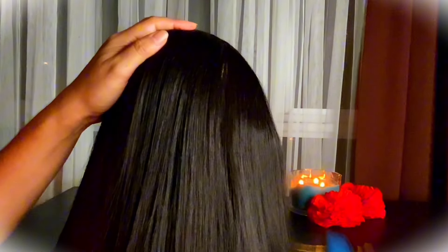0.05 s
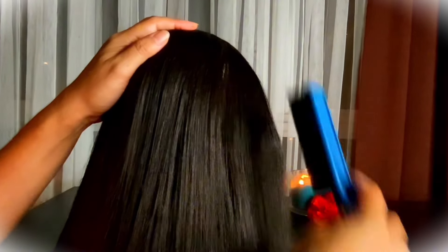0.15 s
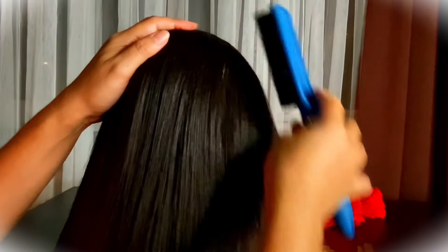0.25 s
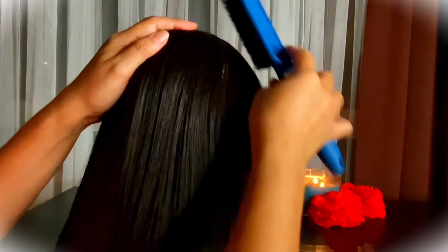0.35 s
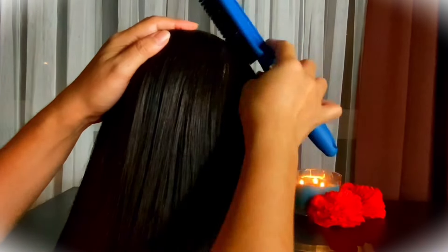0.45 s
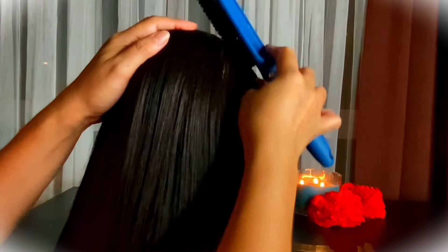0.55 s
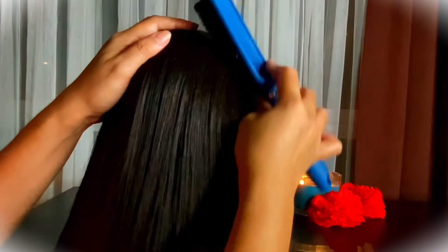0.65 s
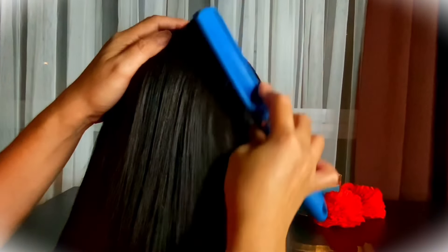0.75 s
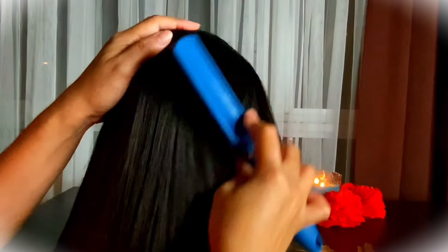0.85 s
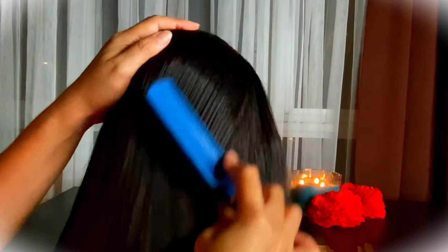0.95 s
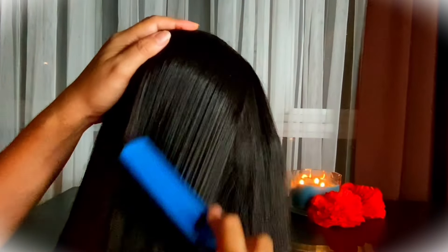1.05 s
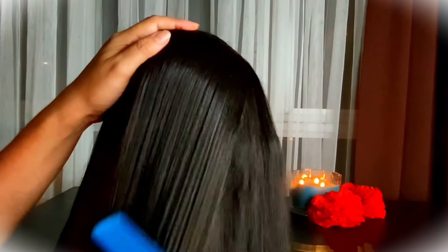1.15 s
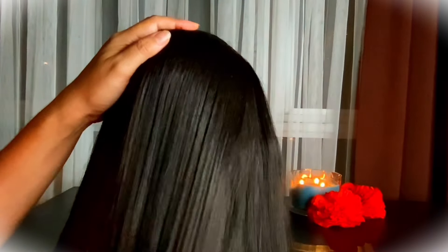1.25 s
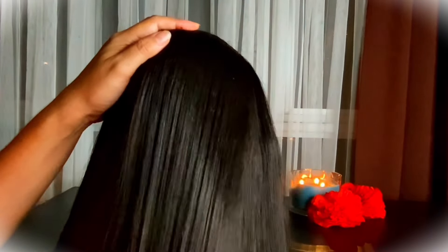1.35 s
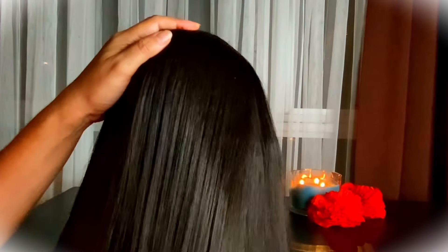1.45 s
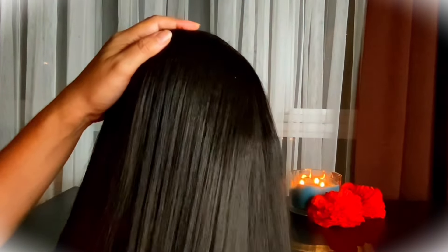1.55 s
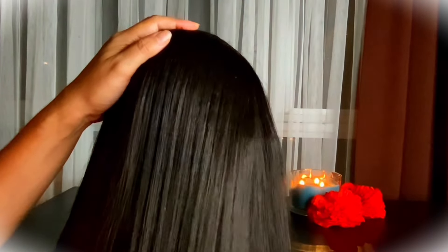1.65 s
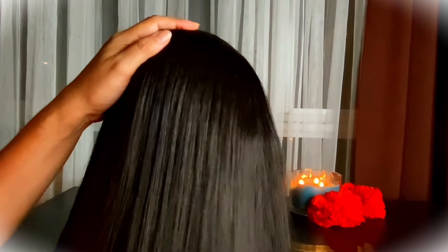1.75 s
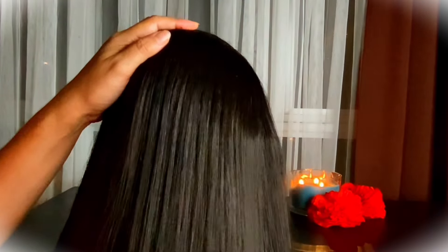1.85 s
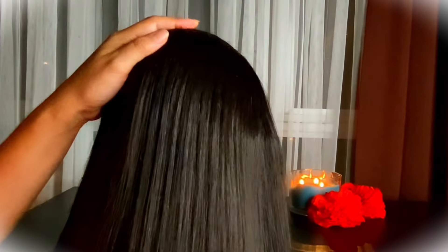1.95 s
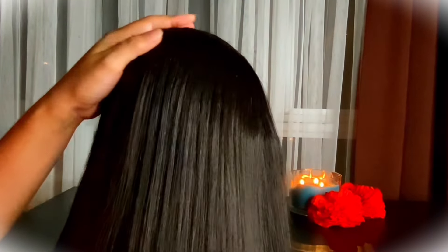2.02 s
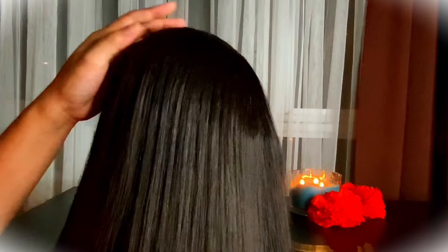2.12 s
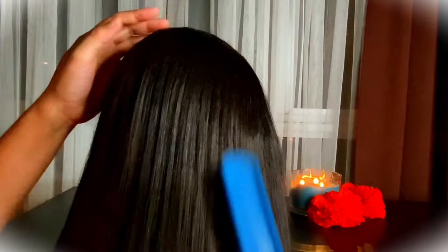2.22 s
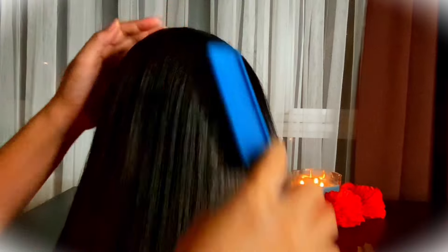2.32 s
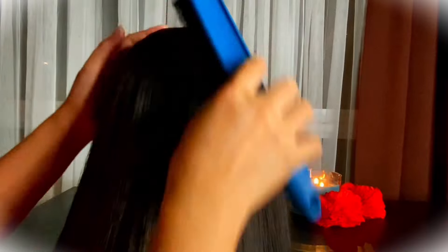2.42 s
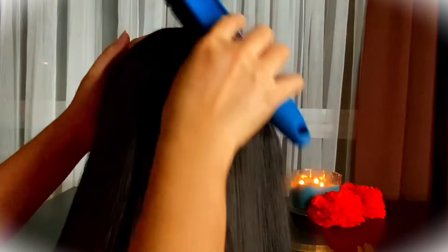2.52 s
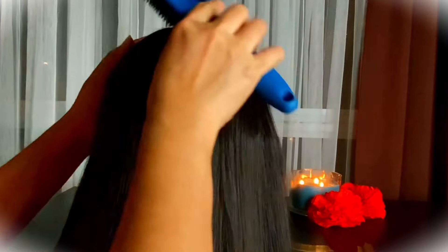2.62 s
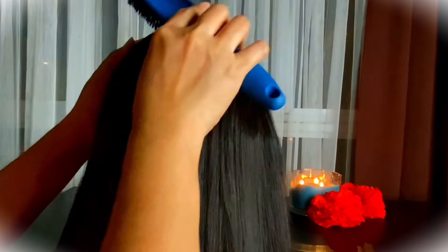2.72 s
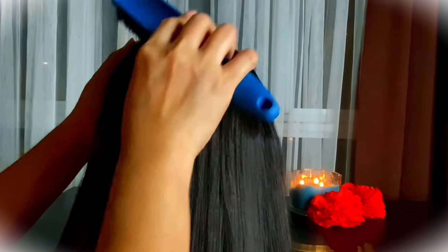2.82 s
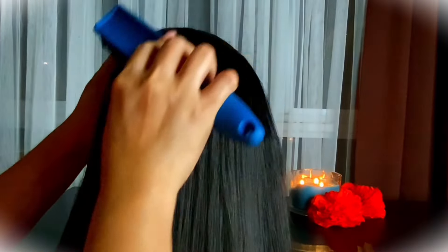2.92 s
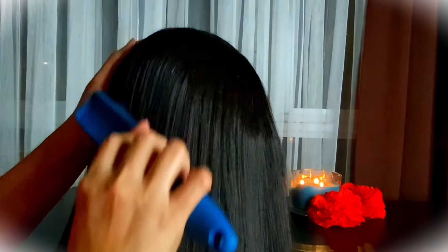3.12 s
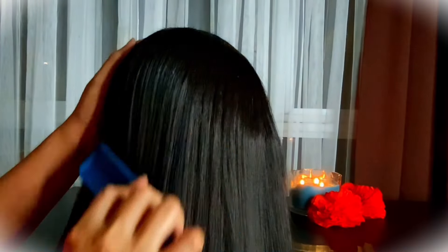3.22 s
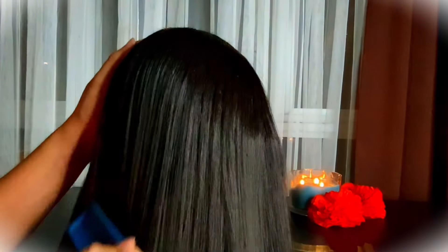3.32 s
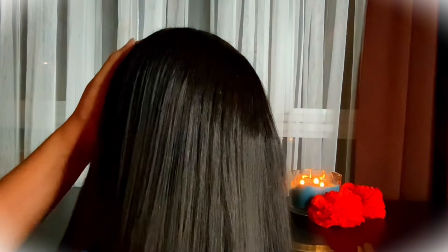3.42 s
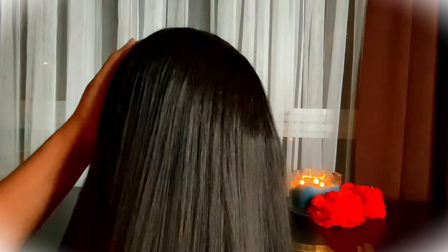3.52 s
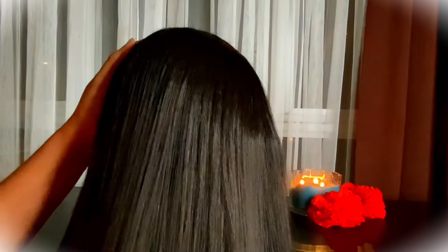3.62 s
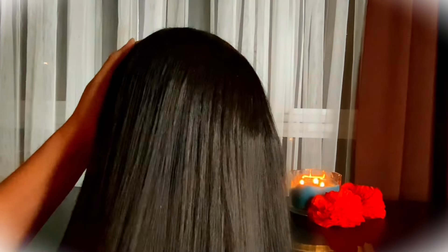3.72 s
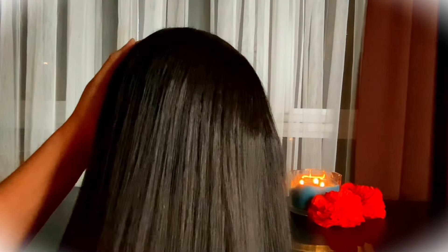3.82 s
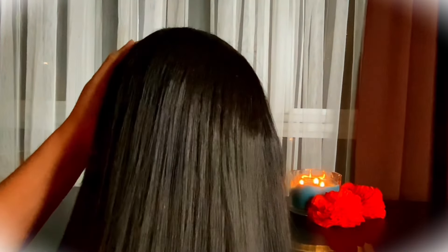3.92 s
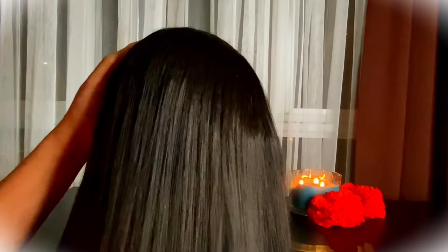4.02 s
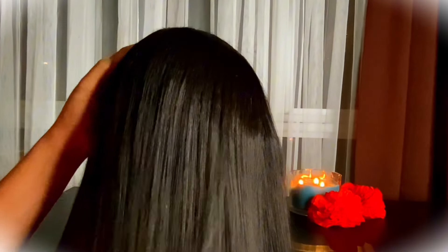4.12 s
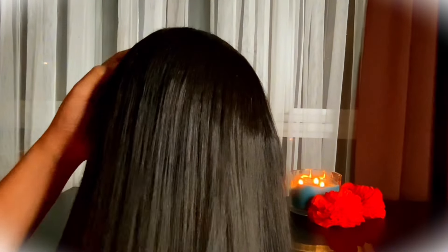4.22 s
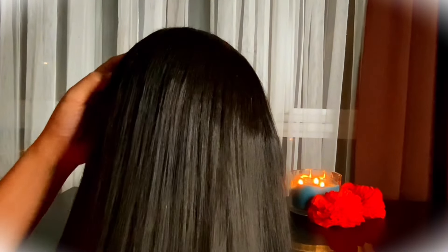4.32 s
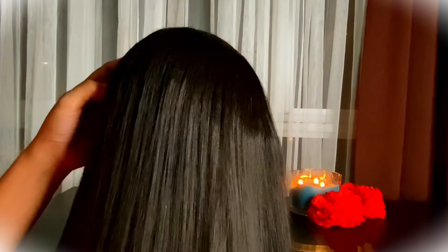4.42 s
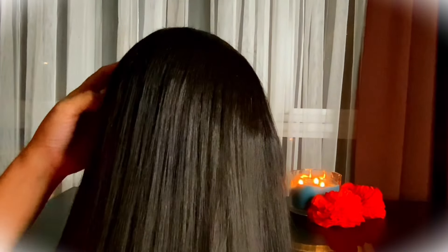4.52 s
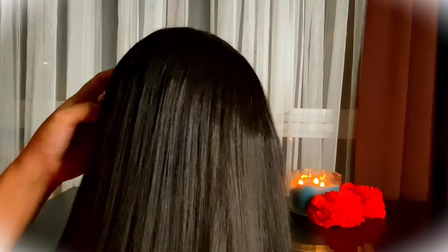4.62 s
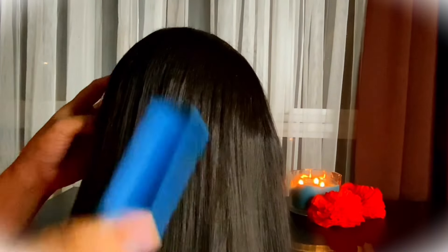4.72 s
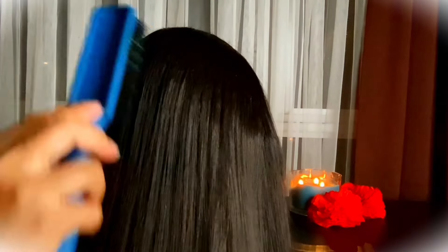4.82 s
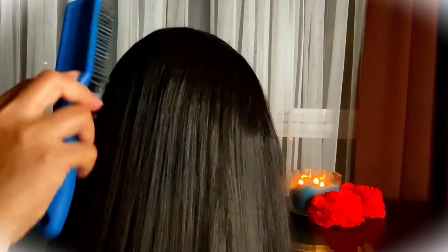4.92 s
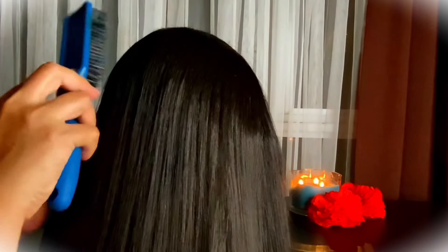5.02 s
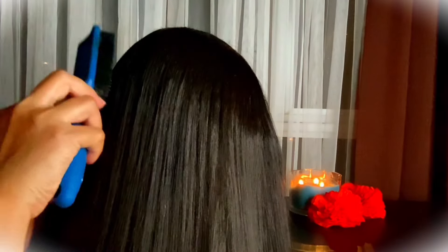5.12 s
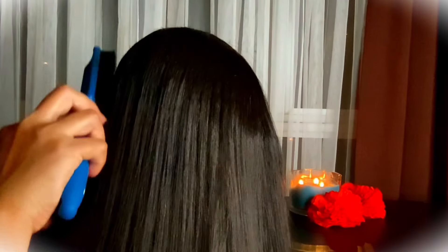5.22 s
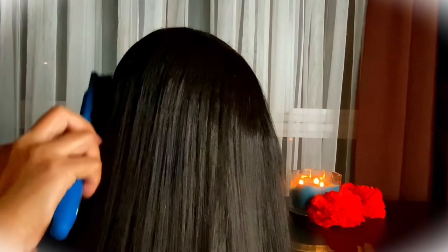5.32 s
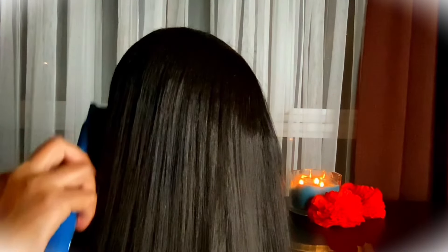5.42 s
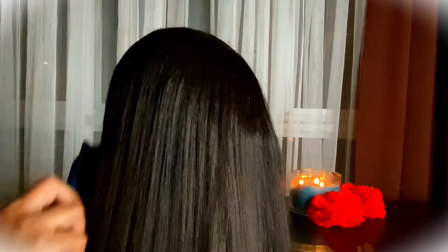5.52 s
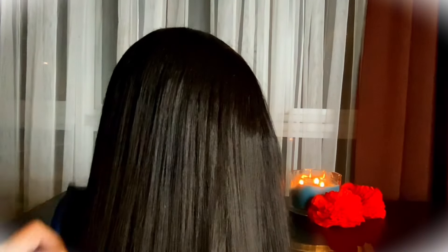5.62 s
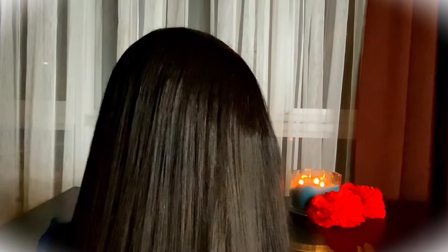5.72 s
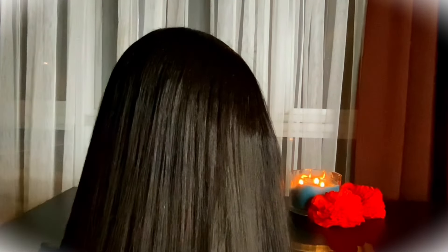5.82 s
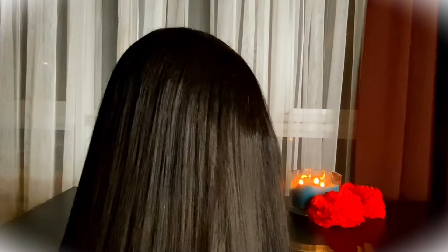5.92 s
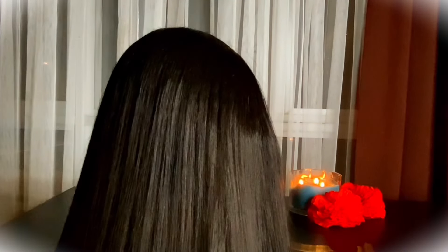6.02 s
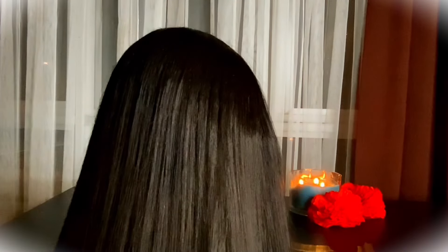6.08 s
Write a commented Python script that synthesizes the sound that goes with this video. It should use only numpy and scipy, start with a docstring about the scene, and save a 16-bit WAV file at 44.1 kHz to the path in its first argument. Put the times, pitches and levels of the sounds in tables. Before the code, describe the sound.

Close stereo hair brushing: one strong crackling stroke with low bumps, then two softer swishes with tiny strand snaps over faint hiss.

```python
"""Brush bristles swish down long hair in a quiet room, heard close, by a microphone at each ear of the head.
Strokes and crown scrapes are streams of tiny slips on noise, coloured apart for each kind of contact.
Strands snap free as short noise bursts; two short thin hisses, mostly treble, are played centred.
The head's drag is noise rumble and rub; thuds, pops, knocks and a few pitched ticks are quickly ringing sines.
Hiss and a low murmur from each microphone lie under it all."""
import sys
import numpy as np
from scipy import signal
from scipy.fft import rfft, irfft, next_fast_len
from scipy.io import wavfile
from scipy.ndimage import uniform_filter1d, map_coordinates

SR = 44100
rng = np.random.default_rng(int(sys.argv[2]) if len(sys.argv) > 2 else 0)


def digitize_waveform(pressure):
    """Quantize a signal to 16-bit integers and store it at the path in sys.argv[1].

    Rows of a 2-D input are taken as channels; values are limited to [-1, 1].
    """
    field = np.atleast_2d(pressure).T
    bounded = np.clip(field, -1, 1)
    quanta = np.round(bounded * 32767).astype(np.int16)
    wavfile.write(sys.argv[1], SR, quanta)


N = 271215  # samples


def amp(db):
    """Decibels to gain."""
    return 10 ** (np.asarray(db) / 20)


def unit(x):
    """Scaled to rms 1."""
    return x / np.sqrt(np.mean(x ** 2) + 1e-20)


def curves(rows):
    """One value per sample for each column after the time."""
    times_s, *columns = np.transpose(rows)
    return [np.interp(np.arange(N) / SR, times_s, column) for column in columns]


def strokes(tables, fade_s=0.25):
    """Tables joined into curves; the level sinks away just outside each table."""
    rows = []
    for table in tables:
        first, last = table[0], table[-1]
        before = (first[0] - fade_s, -100, *first[2:])
        after = (last[0] + fade_s, -100, *last[2:])
        rows += [before, *table, after]
    return curves(rows)


def ears(pan_db):
    """Left and right gains; a positive pan leans left."""
    return amp(np.array([pan_db / 2, -pan_db / 2]))


def spread(pair, alike):
    """Two unrelated streams mixed to a given likeness of the ears."""
    turn = np.arccos(np.clip(alike, -1, 1)) / 2
    mid, side = np.cos(turn) * pair[0], np.sin(turn) * pair[1]
    return np.array([mid + side, mid - side])


def wobble(rate, channels=1):
    """Smooth random curves, rate knots a second."""
    knots = rng.standard_normal((channels, int(N * rate / SR) + 4))
    return np.array([map_coordinates(k, [np.arange(N) * rate / SR]) for k in knots])


def coloured(x, spectrum):
    """x through a spectrum of (hz, db) points on a log axis, each channel at rms 1."""
    size = next_fast_len(N + 8192)
    hz, db = np.transpose(spectrum)
    bins_hz = np.fft.rfftfreq(size, 1 / SR)
    gain = amp(np.interp(np.log(bins_hz + 1), np.log(hz + 1), db, left=-120, right=-120))
    shaped = irfft(rfft(x, size) * gain, size)[:, :N]
    return np.array([unit(channel) for channel in shaped])


def patched(pair, depth_db):
    """Bands swell and sink on their own as different tufts of bristles catch."""
    z = signal.stft(pair, nperseg=256)[2]
    field = rng.standard_normal(z.shape[1:])
    field = uniform_filter1d(field, size=7, axis=0)
    field = uniform_filter1d(field, size=6, axis=1)
    return signal.istft(z * amp(depth_db * unit(field)), nperseg=256)[1][:, :N]


def slips(spread_db, share, clump_db, centre_hz, patchy_db, count, cycles=0.99):
    """Two streams of tiny slips at shared moments, each a short ring at its own pitch, on a clumped bed of noise."""
    when, pitch, size, *phases = rng.random((count, 5)).T
    k = np.arange(96)  # samples in one slip
    pitch_hz = np.clip(centre_hz * 4 ** (2 * pitch - 1), 300, 16000)
    turns = np.outer(pitch_hz / SR, k)
    strength = amp(-spread_db * np.log(np.maximum(size, .008)))
    shape = strength[:, None] * np.exp(-turns / cycles - k / 30)
    where = ((when * N).astype(int)[:, None] + k).ravel()
    streams = []
    for phase in phases:
        rings = shape * np.sin(2 * np.pi * (turns + phase[:, None]))
        streams.append(np.bincount(where, rings.ravel(), minlength=N)[:N])
    grains = np.diff(np.array(streams), prepend=0)  # the faster the slip, the better it radiates
    share = np.clip(share, .05, .95)  # of the power, against the noise
    bed = np.sqrt(share) * unit(grains) + np.sqrt(1 - share) * rng.standard_normal((2, N))
    clumps = amp(clump_db * (0.56 * wobble(14) + wobble(60)))
    return patched(bed, patchy_db) * clumps


# spectrum of the microphones' hiss and low murmur: [hz, level_db (dB per Hz, relative)]
HISS_SPECTRUM = [(8.8, -30), (15, -9), (79, -2.5), (116, -18.5), (207, -25), (240, -19.5), (394, -30.5),
                 (512, -38), (793, -36.5), (1510, -39), (2020, -40), (2860, -42.5), (14700, -44.5),
                 (16000, -49)]


def microphone_hiss():
    """Each microphone has its own unrelated hiss and low murmur."""
    return amp(-54.5) * coloured(rng.standard_normal((2, N)), HISS_SPECTRUM)


# the head shakes under the brush, levels before wobble and pan: [time_s, deep_rumble_db, rub_db]
HEAD_SHAKE = [(0.0, -70, -67), (0.4, -54, -64.5), (0.52, -48, -56), (0.87, -44.5, -53.5), (1.03, -31, -47),
              (1.14, -20, -34.5), (1.175, -22.5, -28.5), (1.2, -20.5, -33.5), (1.23, -23.5, -34),
              (1.28, -29.5, -39), (1.35, -20.5, -37.5), (1.47, -27.5, -44.5), (1.67, -35, -49.5),
              (1.78, -45, -58), (1.92, -51.5, -65), (2.7, -56, -67.5), (2.88, -47, -53.5),
              (3.23, -44.5, -55), (3.31, -41, -51.5), (3.4, -39, -47), (3.5, -39.5, -50.5),
              (3.58, -41.5, -58.5), (3.65, -45.5, -54.5), (3.72, -48, -58), (3.81, -47, -58),
              (3.92, -52.5, -63.5), (4.06, -48, -57), (4.13, -41, -61), (4.25, -53.5, -59), (4.7, -60, -68),
              (4.81, -52, -61), (4.92, -56, -67), (5.6, -54.5, -60), (5.85, -53, -60), (6.15, -53, -59)]
# spectrum of the deep rumble: [hz, level_db (dB per Hz, relative)]
DEEP_SPECTRUM = [(8.8, -25), (15, 5.5), (35, 2), (52, 2.5), (70, 1), (95, -3.5), (124, -8.5), (203, -18.5),
                 (220, -31), (290, -37), (480, -120)]
# spectrum of the rub: [hz, level_db (dB per Hz, relative)]
RUB_SPECTRUM = [(60, -31), (130, -2), (200, -7), (330, -9), (500, -16), (800, -20.5), (1300, -30),
                (2500, -43)]
RUB_LEFT_DB, RUB_FOLLOWS, DEEP_FOLLOWS = 0.5, 0.8, 0.15  # rub follows the swish's pan, rumble the rub's
RUB_SOFT_DB, RUB_LEANS = -49, 0.31  # dB further left per dB of rub above the soft level


def head_rumble():
    """Lumpy noise through hair and bone: the rumble unrelated from ear to ear, the rub only a little alike."""
    deep_db, rub_db = curves(HEAD_SHAKE)
    swish_pan_db = strokes(SWISH_STROKES)[2]
    pan_db = RUB_LEFT_DB + RUB_FOLLOWS * swish_pan_db
    pan_db = pan_db + RUB_LEANS * np.maximum(rub_db - RUB_SOFT_DB, 0)
    deep = coloured(rng.standard_normal((2, N)), DEEP_SPECTRUM)
    deep = deep * amp(2.3 * wobble(7, channels=2))
    rub = rng.standard_normal((2, N)) * amp(2.37 * wobble(45, channels=2))
    rub = spread(coloured(rub, RUB_SPECTRUM), 0.26) * amp(0.7 * wobble(12))
    return amp(deep_db) * ears(DEEP_FOLLOWS * pan_db) * deep + amp(rub_db) * ears(pan_db) * rub


# thuds, pops, knocks and a few pitched ticks, sizes before rise and decay:
# [start_s, left_size (1 = full scale), right_size (1 = full scale), pitch_hz, t60_s, rise_s]
KNOCKS = [(.4345, .36, -.34, 66, .08, .0075), (.438, .085, .085, 62, .12, .006),
          (.465, .075, .05, 58, .09, .003), (.473, .04, -.04, 60, .25, .006),
          (.4375, .03, -.005, 420, .02, .0008), (.439, .006, .006, 900, .03, .0005),
          (1.1695, .4, 0, 130, .025, .001), (1.1774, .9, .05, 270, .01, .0009),
          (1.2034, 2.1, 0, 260, .0095, .001), (1.2035, 0, -.45, 160, .018, .0008),
          (1.2245, .25, 0, 200, .014, .0006), (1.2483, .6, 0, 300, .011, .0008),
          (1.2495, .1, -.45, 140, .016, .0008), (2.682, .0015, .0015, 1600, .012, .0004),
          (2.8215, .004, .004, 1300, .012, .0004), (2.891, .012, .012, 1700, .014, .0004),
          (3.759, -.03, -.01, 150, .03, .001), (4.1095, -.04, -.015, 170, .015, .0003),
          (4.461, .003, .003, 450, .03, .001), (4.7892, -.012, -.012, 620, .016, .0002),
          (4.803, .004, .003, 330, .05, .002), (4.788, -.012, -.008, 60, .06, .003)]


def knocks():
    """Each thud, pop, knock or pitched tick is a quickly decaying sine with its own size and sign at either ear."""
    out, t = np.zeros((2, N + SR)), np.arange(SR // 4) / SR
    for start_s, left, right, pitch_hz, t60_s, rise_s in KNOCKS:
        onset = 1 - np.exp(-(t / rise_s) ** 2)
        ring = np.sin(2 * np.pi * pitch_hz * t) * amp(-60 * t / t60_s) * onset
        out[:, round(start_s * SR):][:, :len(t)] += np.outer([left, right], ring)
    return out[:, :N]


# two short thin hisses: [start_s, length_s, level_db]
THIN_HISSES = [(4.577, 0.067, -63), (4.689, 0.012, -67)]
# their spectrum: [hz, level_db (dB per Hz, relative)]
THIN_SPECTRUM = [(2350, -10), (4000, -10), (4930, -13), (5540, -5), (8310, -4), (9170, -6), (13400, -6),
                 (16000, -12)]
THIN_EDGE_DB_PER_S = 458


def thin_hisses():
    """Two short thin hisses, mostly treble, played centred: slips and noise with steep edges."""
    t = np.arange(N) / SR
    level = np.zeros(N)
    for start_s, length_s, level_db in THIN_HISSES:
        outside_s = np.maximum(0, np.maximum(start_s - t, t - start_s - length_s))
        level += amp(level_db - THIN_EDGE_DB_PER_S * outside_s)
    pair = slips(spread_db=0, share=0.18, clump_db=-0.5, centre_hz=6000, patchy_db=3.0, count=5000)
    return level * spread(coloured(pair, THIN_SPECTRUM), 1.0)


# strands snapping free: [start_s, peak_db (mean of the ears), dullness_db (low band over middle), pan_db (left over right)]
STRAND_TICKS = [(0.3736, -49, -12, 9), (0.409, -59, -6, -2), (0.4384, -45, 22, -10), (0.454, -44.5, -4, 7),
                (0.522, -57, -4, 1), (1.203, -29.5, 5, -5), (1.249, -29, -7, -1), (1.304, -42, 0, 3),
                (1.3206, -26.5, 1, -1), (1.343, -30, -2, 5), (1.3538, -32, 5, 1), (1.358, -32, -10, -10),
                (1.373, -31, -4, 5), (1.403, -31, 9, -1), (1.423, -31, 6, -1), (1.45, -28, -7, 4),
                (1.4868, -39, 4, 2), (1.519, -41, 5, 2), (1.576, -38.5, -0.5, -1), (1.765, -55, 14, -3),
                (1.809, -53, 3, 2), (2.877, -50, 14, -1), (2.8911, -39.5, 8, 8), (3.6428, -37, -9, 7),
                (3.6458, -38, -10, 2), (3.652, -37.5, -7, 4), (3.6848, -40, -8, 3), (3.689, -36, -13, 6),
                (3.762, -34, -8, 5), (3.9206, -44.5, -11, 5), (4.022, -49, 7, 6), (4.1107, -49.5, 1, 2),
                (4.455, -44, 0, 0), (4.765, -67, 18, 0), (4.79, -62, 26, 0), (5.623, -41, -6, 7)]
# the three bands of a snap: [low_hz, high_hz]
SNAP_BANDS = [(900, 3800), (3800, 9500), (9500, 15500)]
TICK_TOP_DB, DULL_CUTS = -3, 0.51  # top band against the middle one; share of the dullness it also loses


def ticks():
    """Each snap is a burst of noise a few milliseconds long, with its own weight in three bands."""
    out, t = np.zeros((2, N + SR)), np.arange(1024) / SR
    envelope = amp(-60 * t / 0.01) * (1 - np.exp(-t / 0.00015))
    noise = rng.standard_normal((len(STRAND_TICKS), 3, 3, len(t))) * envelope
    filters = [signal.butter(3, band, "band", fs=SR, output="sos") for band in SNAP_BANDS]
    for (start_s, peak_db, dull_db, pan_db), bursts in zip(STRAND_TICKS, noise):
        weights_db = dull_db, 0, TICK_TOP_DB - DULL_CUTS * dull_db
        bands = [amp(db) * unit(signal.sosfilt(f, burst))
                 for db, f, burst in zip(weights_db, filters, bursts)]
        shared, left, right = sum(bands)
        apart = 0.11 + 0.086 * abs(pan_db)  # snaps off to one side differ more between the ears
        both = ears(pan_db)[:, None] * (shared + apart * np.array([left, right]))
        peak = np.abs(both.mean(axis=0)).max()
        out[:, round(start_s * SR):][:, :len(t)] += amp(peak_db) * both / peak
    return out[:, :N]


FADE_DB = 7.5  # how far under its held level a contact ends


def contact(start_s, swell_s, swell_db, hold_s, fade_s, level_db, sag_db, first_db, last_db):
    """Level and brightness of one contact: swell, sagging hold, fade; the colour drifts evenly."""
    times_s = start_s + np.cumsum([0, swell_s, hold_s, fade_s])
    levels_db = level_db - np.array([swell_db, 0, sag_db, sag_db + FADE_DB])
    bright_db = np.interp(times_s, times_s[[0, -1]], [first_db, last_db])
    return strokes([list(zip(times_s, levels_db, bright_db))])


# bristles on the crown, one row a contact, level before side and treble are added:
# [start_s, swell_s, swell_depth_db, hold_s, fade_s, level_db, sag_db (over the hold),
#  first_brightness_db, last_brightness_db, treble_pan_db (left over right)]
CROWN_CONTACTS = [(0.515, 0.14, 11, 0.25, 0.087, -49, 2.5, -5, 12.5, -3.5),
                  (2.662, 0.18, 20.5, 0.23, 0.065, -55.5, -1.5, -1.5, 5, 0.5),
                  (4.24, 0.036, 18, 0.1, 0.1, -63, 8.5, -18, 2, 17),
                  (4.785, 0.012, 4, 0.045, 0.02, -71.5, 0, -5, -4, 2)]
# what the ears share, one spectrum for each of the first three contacts: [hz, level_db (dB per Hz, relative)]
SCALP_MID_SPECTRA = [
    [(180, -32), (300, -6), (385, 1.5), (546, -10.5), (708, -6.5), (758, 1), (836, -5), (922, 3),
     (1000, -3), (1070, 1.5), (1190, -3), (1280, -18), (1350, -4.5), (1480, -3), (1680, -7.5), (2260, -8),
     (3030, -14.5), (4300, -19), (5200, -15), (6960, -13), (8500, -16.5), (11500, -23.5), (15000, -25),
     (16000, -18)],
    [(180, -21), (300, -12), (462, 8), (511, -21), (645, -1.5), (1080, -0.5), (1230, -8), (1400, -2),
     (1500, 6.5), (1600, -2.5), (1760, -2), (2300, -4), (2700, -9), (2870, -12), (3200, -10), (4500, -17),
     (6960, -11), (7950, -30), (12100, -25), (16000, -38)],
    [(180, -22), (300, -21), (445, -9), (561, 0.5), (850, -1), (1100, -8), (1600, -11), (2050, -10),
     (2300, -17), (3000, -22), (3900, -63), (6600, -120)],
]
# what is opposed between the ears: [hz, level_db (dB per Hz, relative)]
SCALP_SIDE_SPECTRUM = [(180, -37), (300, -34), (337, 0), (502, -5), (774, -1), (842, -6), (2170, -12),
                       (3640, -9), (5700, -15), (7690, -2), (10600, -15), (12700, -13), (16000, -20)]


def crown():
    """Bristles scrape the scalp: slips coloured by the contact, plus a part opposed between the ears."""
    a, b = slips(spread_db=3.5, share=0.22, clump_db=0.4, centre_hz=2340, patchy_db=0.7, count=12000)
    side = amp(-3.5) * coloured(b[None], SCALP_SIDE_SPECTRUM)[0]
    lowpass = signal.butter(2, 2300, fs=SR, output="sos")
    # the short fourth contact borrows the third one's colour
    spectra = SCALP_MID_SPECTRA + SCALP_MID_SPECTRA[-1:]
    out = np.zeros((2, N))
    for (*shape, pan_db), spectrum in zip(CROWN_CONTACTS, spectra):
        level_db, bright_db = contact(*shape)
        mid = coloured(a[None], spectrum)[0]
        both = np.array([mid + side, mid - side])
        low = signal.sosfiltfilt(lowpass, both)
        treble = amp(bright_db) * ears(pan_db)[:, None] * (both - low)
        out += amp(level_db) * (low + treble)
    return out


# bristles down the hair, one table a stroke, level before the bands are summed:
# [time_s, level_db, air_db (treble above 10 kHz, relative), pan_db (left over right),
#  likeness of the ears (-1..1) under 6.5 kHz, up to 10 kHz, above 10 kHz]
SWISH_STROKES = [
    [(0.92, -73, 14, 4, .2, -.4, -.5), (1.016, -52, -1, 0, .3, -0.15, -.5),
     (1.09, -45, -1, 0, 0.32, -0.26, -0.54), (1.14, -43, -4, 4.5, 0.49, -.2, -.1),
     (1.184, -41, -3.5, 5.5, 0.35, -0.086, -0.072), (1.238, -39.5, -1, 2.5, 0.98, .4, .4),
     (1.306, -44, -4.5, -1, 1, 0.62, 0.67), (1.358, -39, -4.5, -0.5, 1, .75, .6),
     (1.43, -43, -2.5, 0, 1, 0.19, 0.14), (1.568, -55.5, -8, 0, 1, -0.032, -0.98),
     (1.675, -56.5, -7, 0, 1, -0.16, -0.89), (1.726, -70.5, -8, 2, 0.67, 0, -.5),
     (1.83, -79, -15, 3, .8, -0.063, -.4)],
    [(2.93, -67, 0, 2, .2, -.4, -.1), (3.08, -56, -3, 7, .15, -.3, 0),
     (3.194, -53.5, -3.5, 3, 0.17, 0.34, 0), (3.38, -52.5, -2.5, 9.5, 0.12, 0.46, 0),
     (3.49, -52, -1, 8, .45, .45, .3), (3.54, -55.5, -1.5, 7, 0.53, 0.51, .55),
     (3.63, -54.5, -4, 6, .6, 0.5, .6), (3.77, -57.5, -4, 3, 0.62, 0.45, .6),
     (3.84, -64.5, -3.5, 4.5, .55, 0.18, .3), (4.052, -62.5, -5.5, 1.5, 0.65, -0.002, -.1),
     (4.17, -81, -6, 2, .5, .1, -.1)],
    [(4.74, -72.5, -1.5, 4, 0.12, -0.15, .4), (5.03, -66, -1.5, 4, -0.2, -0.51, .4),
     (5.19, -66, 0, 4, -.5, 0, .5), (5.36, -62.5, -1, 4.5, -0.3, -.2, 0.0086),
     (5.544, -58, -2, 5.5, -.35, 0.11, .35), (5.732, -58.5, -3.5, 3.5, -.45, -.2, 0),
     (5.87, -61, -7, 6, -0.34, -0.67, -.55), (6.15, -62.5, -3, 7, -0.33, -0.67, -0.41)],
]
# the hollow between brush and head lifts one band, one row a stroke: [pitch_hz, width_hz, end_level_db]
HOLLOW_BANDS = [(3070, 550, -18), (3200, 330, -12), (2750, 640, -12)]
# crisp snags crowd in where the hair tangles: [time_s, level_db (against the crackle, before colouring)]
TANGLE_LEVELS = [(1.0, -11.5), (1.2, -8.5), (1.5, -6.5), (1.6, -15), (3.4, -13.5), (3.6, -7), (3.8, -7),
                 (4.1, -13), (5.0, -20)]
# main spectrum of the strands: [hz, level_db (dB per Hz, relative)]
HAIR_SPECTRUM = [(2100, -20.5), (2600, -4), (3300, -1), (3800, -2), (5000, -1), (6500, -0.5), (8500, 1),
                 (9800, -5.5), (12000, -44)]
# spectrum of the top treble: [hz, level_db (dB per Hz, relative)]
AIR_SPECTRUM = [(8500, -17.5), (10500, -4), (13000, -1), (16000, -6.5)]
# spectrum of the fullness, mostly under 2.5 kHz: [hz, level_db (dB per Hz, relative)]
FULL_SPECTRUM = [(500, -4), (900, -2.5), (1500, -1.5), (2200, -1), (2900, -17)]
FULL_DB, FULL_PER_DB = -9.5, 0.05  # fullness at the loudest moment; dB it falls per dB of softer stroke


def swish():
    """Bristles slide down the strands: a dense, bright crackle that the ears lift near 3 and 8 kHz."""
    level_db, air_db, pan_db, *alike = strokes(SWISH_STROKES)
    snagging = 0.23 + 0.0045 * (level_db + 47.5)  # the harder the stroke, the more strands catch and slip
    pair = slips(spread_db=1.5, share=snagging, clump_db=0.5, centre_hz=3740, patchy_db=1.06, count=9000)
    snags = slips(spread_db=3, share=.95, clump_db=1.5, centre_hz=2400, patchy_db=0.3, count=2000, cycles=2.5)
    pair = pair + amp(curves(TANGLE_LEVELS)[0]) * snags
    bright = coloured(pair, HAIR_SPECTRUM)
    under = signal.sosfiltfilt(signal.butter(3, 6500, fs=SR, output="sos"), bright)
    full_db = FULL_DB + FULL_PER_DB * (level_db - level_db.max())
    long_waves = under + amp(full_db) * coloured(pair, FULL_SPECTRUM)
    for table, (pitch_hz, width_hz, end_db) in zip(SWISH_STROKES, HOLLOW_BANDS):
        span = slice(round(table[0][0] * SR), round(table[-1][0] * SR))
        growth = np.linspace(0, 1, span.stop - span.start)  # stronger late in the stroke
        resonator = signal.iirpeak(pitch_hz, pitch_hz / width_hz, SR)
        ringing = unit(signal.lfilter(*resonator, pair[:, span]))
        long_waves[:, span] += amp(end_db) * growth * ringing
    bands = long_waves, bright - under, amp(air_db) * coloured(pair, AIR_SPECTRUM)
    return amp(level_db) * ears(pan_db) * sum(map(spread, bands, alike))


def scene():
    """Brush, hair and head."""
    return head_rumble() + knocks() + thin_hisses() + ticks() + crown() + swish()


def record(dry):
    """The microphones add their hiss; nothing is kept above the band limit."""
    wet = dry + microphone_hiss()
    size = next_fast_len(N + 8192)
    kept = np.fft.rfftfreq(size, 1 / SR) < 15850  # Hz
    return irfft(rfft(wet, size) * kept, size)[:, :N]


dry = scene()
out = record(dry)
digitize_waveform(out)
```